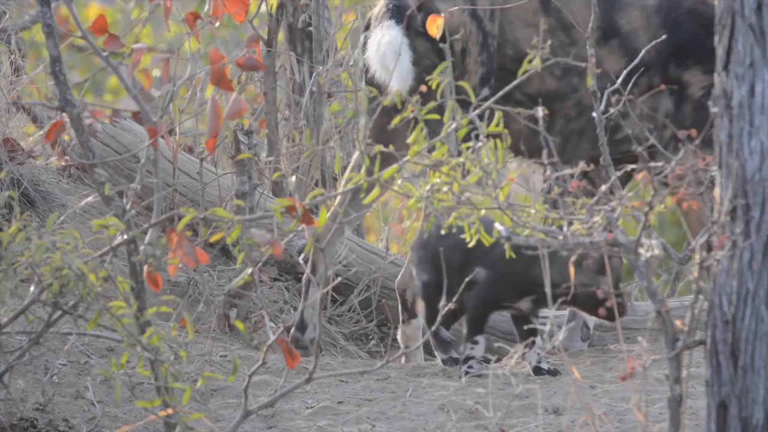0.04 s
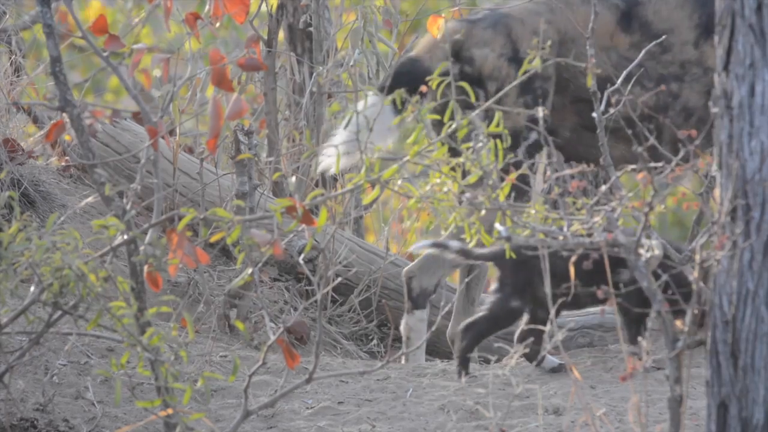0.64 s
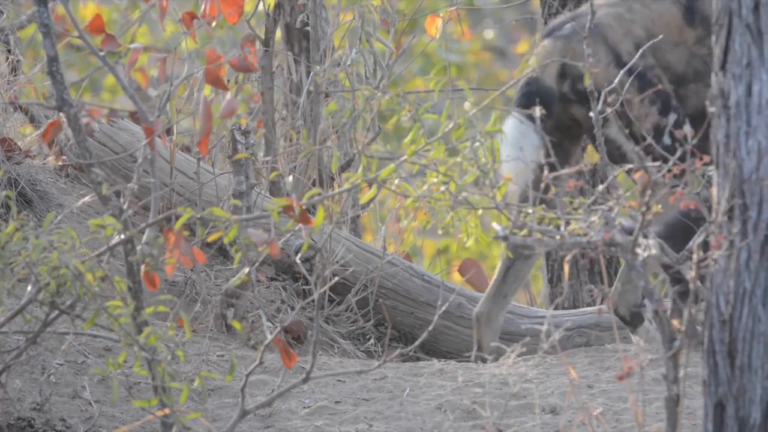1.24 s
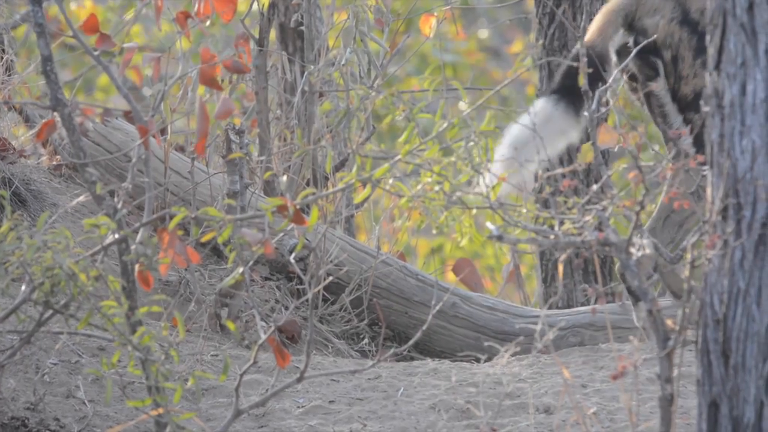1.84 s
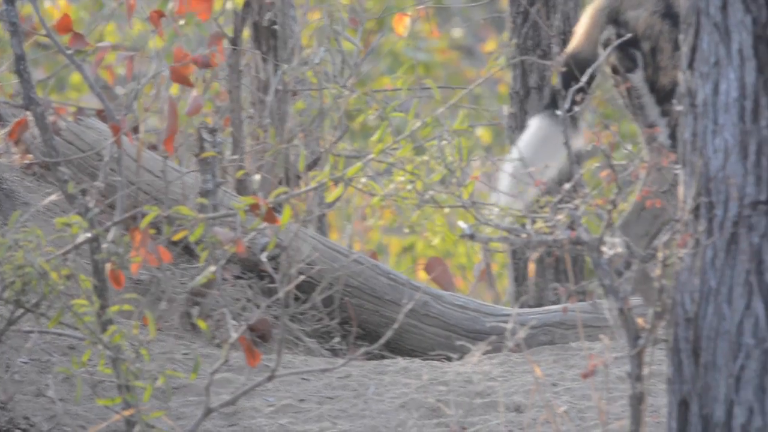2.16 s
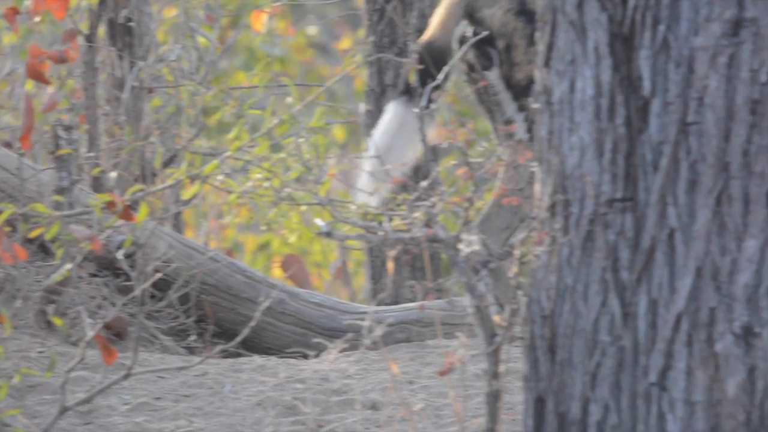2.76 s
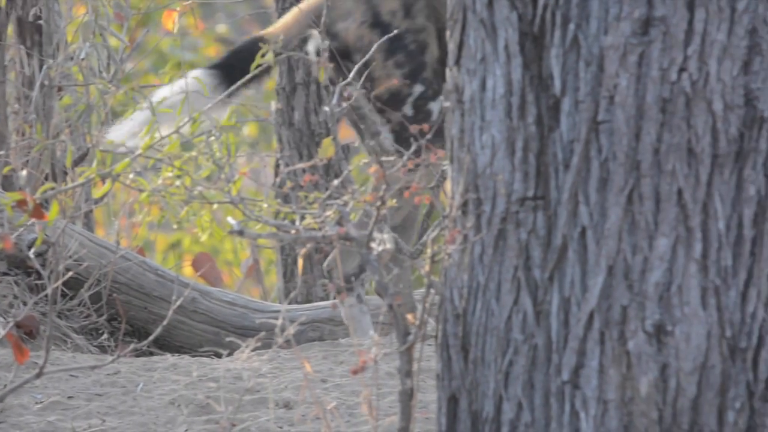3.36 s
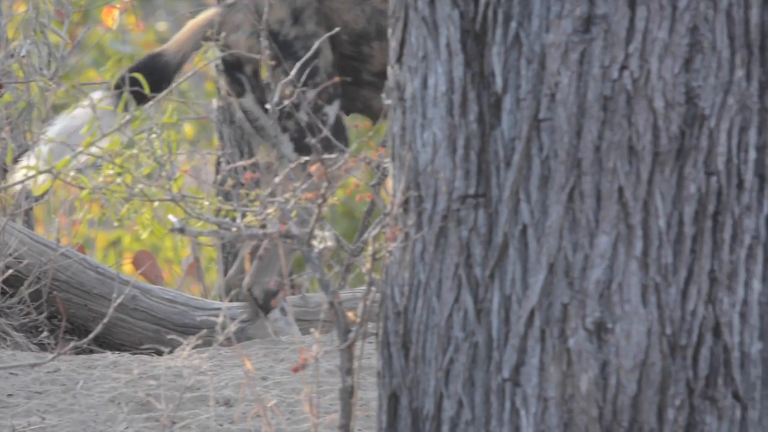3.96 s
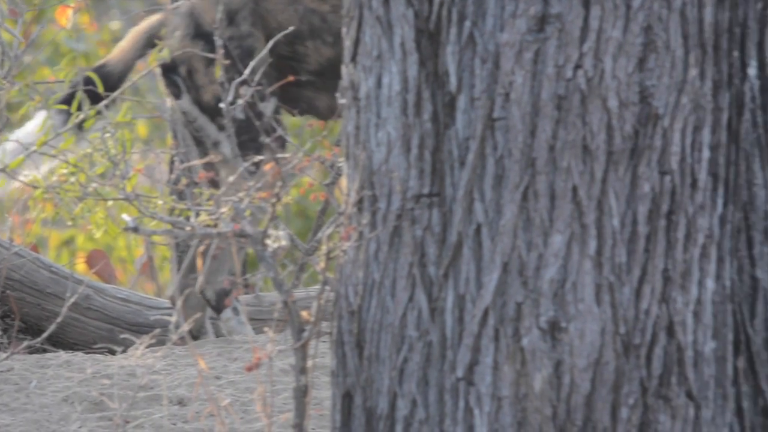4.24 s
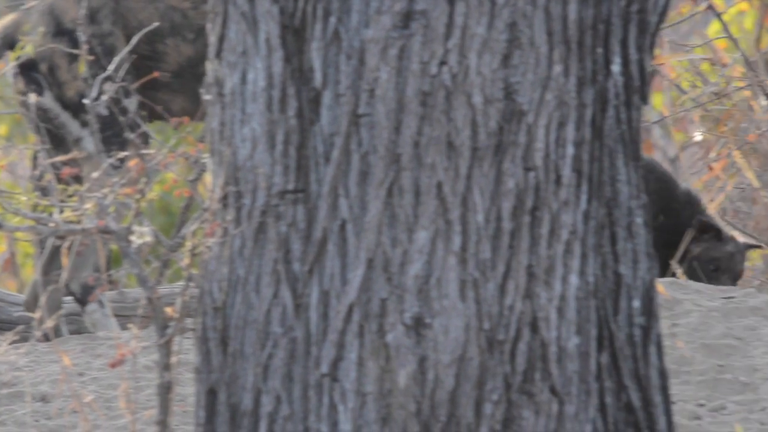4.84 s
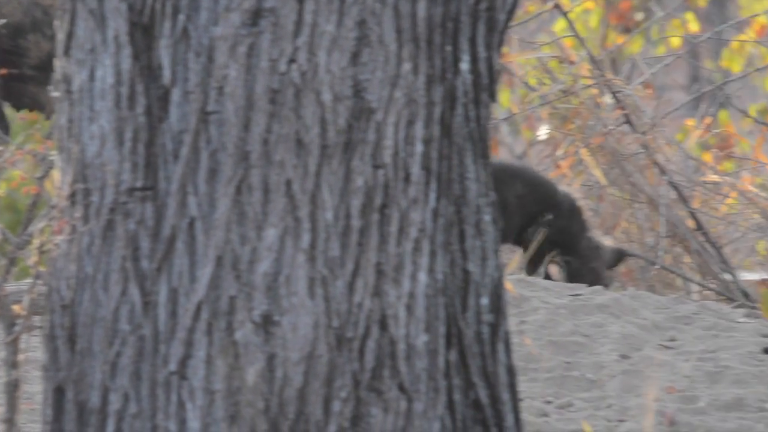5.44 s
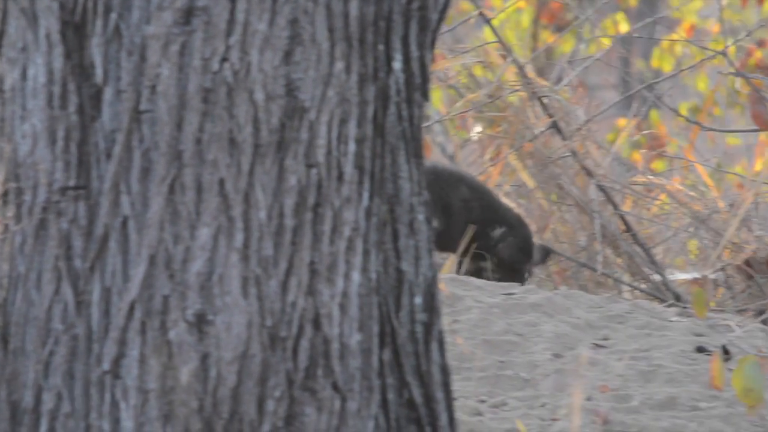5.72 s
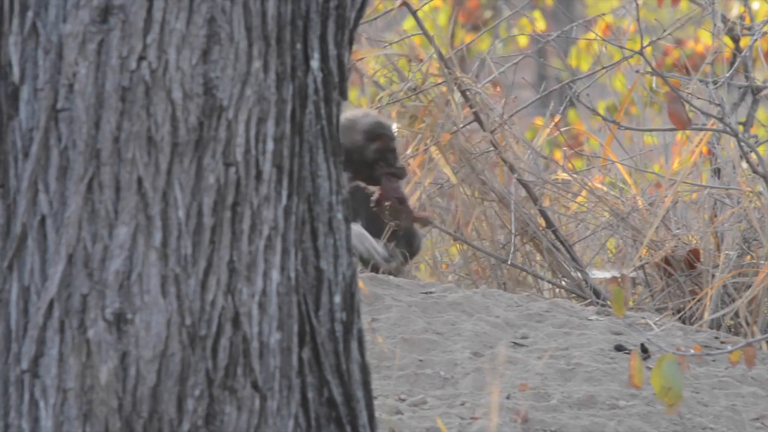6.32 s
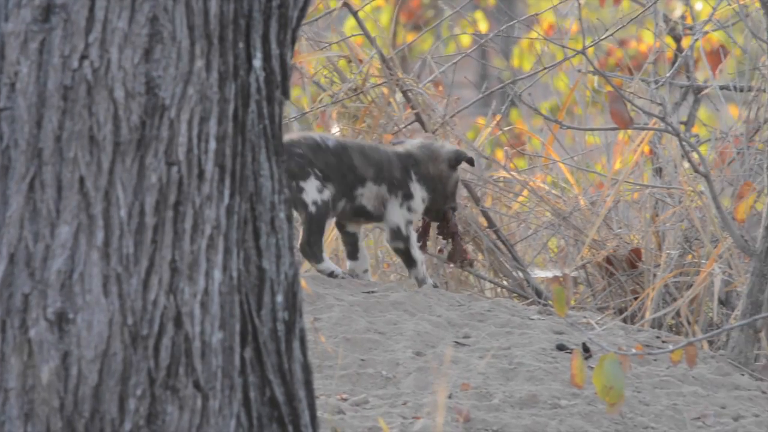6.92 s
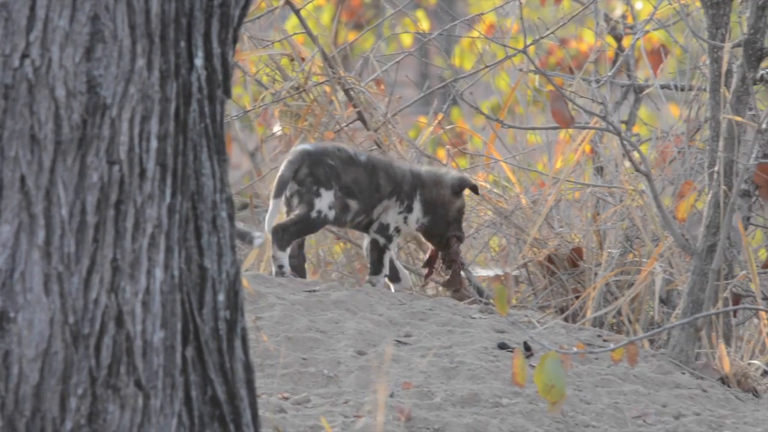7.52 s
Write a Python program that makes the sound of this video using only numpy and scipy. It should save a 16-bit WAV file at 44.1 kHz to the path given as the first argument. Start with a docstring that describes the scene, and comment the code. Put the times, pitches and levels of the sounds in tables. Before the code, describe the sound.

Wild dogs give short, high twittering chirps and whimpers in the bush, over a low gusting wind rumble.

```python
"""Wild dogs at a woodland den

Dogs twitter in short pitch arches, two of them louder, that ring among the trunks; whimpers glide
through a mouth resonance. Thin whistles, from pups or small birds, come from ahead and the right.
Paws crackle in dry leaves. Wind buffets the right microphone with a low rumble, over a faint hiss."""
import sys
import numpy as np
from scipy import signal
from scipy.fft import rfft, irfft
from scipy.io import wavfile
from scipy.ndimage import uniform_filter1d, map_coordinates

SR = 44100
rng = np.random.default_rng(int(sys.argv[2]) if len(sys.argv) > 2 else 0)


def materialize(psi):
    """Save the field psi as 16-bit PCM at rate SR to the path in sys.argv[1].

    A 1-D psi becomes a single channel; in a 2-D psi each row is a channel.
    """
    bounded = np.clip(np.atleast_2d(psi).T, -1, 1)
    quanta = np.round(bounded * 32767).astype(np.int16)
    wavfile.write(sys.argv[1], SR, quanta)


N = 338672
TIME = np.arange(N) / SR

# Table levels precede the mix gains. Pan is left minus right; crest is the top's place in the call.
# dog chirps: (time [s], length [s], top [Hz], rise [semitones], fall [semitones], crest [0-1],
#   level [dB], 2nd harmonic [dB], 3rd harmonic [dB], pan [dB], echo send [dB], rasp [0-1])
TWITTERS = [ (2.913, 0.06, 3340, 2.4, 1.5, 0.49, -73.5, 12.5, 7, 0, 0, 0.37),
            (3.018, .068, 3280, 1.2, 1, 0.38, -64.5, 3.5, -5, 0, -3, 0.12),
            (3.095, .04, 1560, 7, 0, .98, -62, -12, -12, -11, -7, .3),
            (3.588, .046, 3280, 2.5, 1, 0.32, -51, -9, -17, 0, -3.5, 0.27),
            (3.622, .025, 2000, -1, 5, 0, -54.5, -20, -24, 0, -8, .8),
            (3.647, 0.013, 1765, 1.5, 0, .8, -53.5, -20, -24, 0, -3.5, .7),
            (3.772, .06, 3140, 5, 0.8, .55, -46.5, -9.5, -20, 0.5, -6, 0.3),
            (4.124, 0.016, 1420, 1, 9, 0, -57, -9, -11.5, -24, -12, .67),
            (4.27, 0.012, 2100, 3.5, 1, 0.9, -59, -16, -12, -15, -14, 0.5),
            (4.301, 0.015, 2110, 1, 3, 0, -56, -21, -22, -22, -14, .6),
            (4.932, 0.017, 967, 0.5, 2, .3, -64.5, -0.5, -8, -18, -22, .3),
            (5.575, 0.064, 2990, 3.3, 6, .45, -70, -10, -16, -21, -7, 0.5),
            (5.673, .062, 3150, 6, 1.5, .55, -69, -1, -12, -18, -4, .5),
            (6.068, 0.051, 3060, 2.3, 2.8, 0.64, -55, -3, -18, -24, -10, .54),
            (6.172, 0.077, 2770, 1, 3.5, 0.55, -77, 8, -6, -17, -13, .5),
            (6.243, 0.028, 2180, -0.5, 7, 0, -67.5, -12, -20, -18, -12, 0.7),
            (6.445, 0.064, 3110, 5.5, 2, 0.88, -58.5, 5, -14, -28, -7.5, 0.62),
            (6.512, 0.02, 2320, -2, 10, .02, -63, -12, -18, -19, -8, 0.9),
            (7.124, 0.023, 1743, 4, 4, 1, -56.5, -19, -18, -22, -13, 0.6),
            (7.147, .062, 2910, 5, 8.5, 0.43, -65.5, -3, -16, -22, -8, 0.4)]
# dog whimpers: (time [s], length [s], top [Hz], rise [semitones], fall [semitones], crest [0-1],
#   level [dB], pan [dB])
WHIMPERS = [ (1.551, .13, 1641, 7.5, 1, .85, -56.5, 0), (1.887, .154, 1844, 7, 3, 0.32, -53, 0),
            (2.164, 0.11, 2095, -1.5, 0, .5, -53, -17), (2.229, 0.035, 1180, 2.5, 1, 0.48, -48, 0),
            (2.478, .036, 1223, 1.6, .5, .5, -52.5, 0), (2.57, 0.088, 1545, 6.5, 5.5, 0.4, -52, 0),
            (7.54, 0.073, 2180, -1.4, 0, 0.4, -56, -4)]
# thin whistles: (time [s], length [s], pitch [Hz], scoop [semitones], slide [semitones],
#   level [dB], swell [dB], pan [dB], rasp [0-1])
WHISTLES = [ (.005, 0.029, 8020, .2, 0, -65.5, -7, -21, .3), (0.217, 0.05, 3850, 0, 1.2, -71, 5, -18, .1),
            (.747, .055, 10900, 0, .5, -73, 0, -14, .1), (0.756, 0.12, 7620, 1.5, -.6, -71, 6, -19, .1),
            (0.89, 0.045, 6430, 2, 0.5, -67, -2, -19, .1),
            (0.936, 0.137, 5880, 0.5, 0.5, -63.5, -0.5, -23, 0.7),
            (0.978, 0.11, 7710, 1, 0, -72, -4, 0, .1), (1.203, .036, 9450, 2.4, -0.7, -61, 3, -23, .78),
            (1.437, 0.034, 7870, 1.5, 0.5, -68, -7, 2, 0), (1.523, .026, 6180, 0, 1.1, -67, -8, -17, .4),
            (1.598, 0.059, 10900, 1, -.5, -69, 0, 2, 0), (1.69, 0.046, 5000, 7, -0.5, -63, 16, -22, 0.15),
            (1.83, .045, 14420, 2.5, 0, -64, 0, -4, .55),
            (1.876, .105, 12580, 0.5, -0.5, -64.5, -5, 0, 0.3),
            (2.059, 0.081, 7640, 2, 0.2, -72, -8, 0, 0.35),
            (2.148, .035, 4620, 3.8, -.4, -65.5, 2, -24, .1), (2.162, 0.037, 6930, 1, 0.5, -70, 0, -6, .6),
            (2.222, 0.04, 4140, 0, 0.8, -64, -3, -17, .1), (2.41, 0.14, 8500, -1, -.4, -67.5, 11, -21, 0),
            (2.452, .055, 15750, .9, -.6, -62, -6, -5, .6), (2.854, 0.13, 8060, 0.5, 0, -69.5, -8, 0, 0.35),
            (3.403, .06, 4950, -0.5, -2.7, -72, 2, -17, .1), (3.428, 0.052, 9380, 3, 0, -70, 12, -2, 0.4),
            (3.537, .037, 9640, 3.2, 0.5, -66.5, -5, 0, .55),
            (4.15, 0.16, 5320, -1, -0.5, -73, 3, -19, 0.4), (4.52, .115, 5480, .1, -.3, -75, 0, -11, .15),
            (4.85, .15, 5380, .1, 0, -66.5, 3, -21, .12), (4.99, .043, 4910, -1, -0.5, -71, -6, -14, 0),
            (5.085, .071, 7915, 0, 0, -63, -6, 1, .22),
            (5.244, 0.099, 5240, -1.5, -.9, -66.5, 13, -21, 0.22),
            (5.403, .14, 7880, .35, -.15, -64.5, -1, 0, .4), (5.513, .1, 5280, 0, -.8, -62, 3, -28, .25),
            (5.612, 0.044, 4970, -0.5, 1, -54, 0, -31, .45), (5.788, 0.022, 7800, 1.3, 0, -58.5, 4, 0, 0.9),
            (5.803, 0.15, 5590, 4, -1.1, -65, 4, -20, 0.06),
            (5.96, 0.017, 4600, 0.5, 1.5, -47.5, -4, -34, 1), (6.115, 0.055, 7360, 0.9, 0, -61, 3, 0, 0.17),
            (7.442, .045, 11430, 0.5, 0, -69, 4, 0, .1), (7.482, .028, 12500, 0, 0.5, -63.5, -4, 0, 0.2)]
# steps in leaf litter: (time [s], length [s], level [dB], centre [Hz])
STEPS = [(0.264, 0.064, -68, 2430), (0.363, 0.21, -71, 3120), (.66, 0.35, -73.5, 3000),
         (0.922, 0.32, -74, 4000), (2.47, 0.16, -68, 11500), (2.602, 0.13, -69.5, 12000),
         (3.42, .07, -71, 10500), (4.094, .05, -72, 9000), (5.77, 0.054, -70, 11000),
         (6.3, .05, -72, 12900), (6.9, .03, -70, 9500), (6.96, 0.041, -73, 8000), (7.035, .04, -70, 9500),
         (7.15, .06, -71, 10000), (7.245, .03, -69, 10000)]
# breeze on the microphone: (time [s], rumble [dB], eddy offset [dB])
BREEZE = [(0, -49, -17), (.12, -53, -26), (.4, -46, -16.5), (1.5, -47.5, -25.5), (1.85, -49, -15),
          (2.1, -41.5, -15), (2.42, -42.5, -16.5), (2.9, -42, -17), (3.42, -44.5, -16), (3.8, -39.5, -16.5),
          (4.8, -38.5, -14.5), (5.2, -34, -12), (5.8, -32.5, -14), (6.3, -35, -16), (6.72, -37.5, -16),
          (7.1, -41, -12.5), (7.5, -40, -23), (7.68, -48, -11)]
# gusts: (time [s], length [s], rumble [dB], eddy offset [dB])
GUSTS = [(0.232, 0.053, -36.5, -36), (0.296, .11, -37.5, -25), (0.659, 0.053, -35.5, -16.5),
         (0.74, 0.11, -38, -27.5), (0.871, 0.049, -35.5, -20), (0.965, 0.091, -39.5, -27),
         (1.188, 0.057, -43.5, -12), (1.32, 0.2, -42, -30), (2.127, .12, -37.5, -18),
         (2.508, 0.14, -36.5, -11), (2.595, 0.22, -30.5, -19.5), (3.095, 0.12, -38.5, -17),
         (3.557, 0.028, -34.5, -30), (3.622, 0.085, -35, -13.5), (4.011, 0.052, -35.5, -21),
         (4.145, 0.21, -38.5, -8.5), (4.34, 0.024, -32.5, -15), (4.596, 0.093, -29, -23),
         (4.868, 0.064, -31, -13), (4.994, 0.11, -36, -9.5), (5.344, 0.2, -26.5, -10.5),
         (5.502, .1, -27.5, -10), (5.662, 0.063, -28, -23), (6.334, 0.12, -35.5, -19),
         (6.606, 0.039, -41, -6), (6.742, 0.048, -33, -9.5), (6.81, 0.043, -34, -17),
         (7.24, 0.13, -37, -12)]
# sharp air pulses: (time [s], level [dB], pitch [Hz])
BUFFETS = [(0.671, -38, 177), (0.909, -41, 138), (1.832, -37.5, 172), (2.617, -32, 290),
           (2.621, -19.5, 104), (2.77, -42.5, 230), (3.645, -38, 166), (4.168, -48, 188),
           (4.691, -33.5, 186), (4.744, -33, 163), (5.072, -44, 160), (5.339, -32, 207),
           (5.553, -22.5, 102), (5.618, -37.5, 366), (5.781, -40, 159), (6.427, -49, 170)]
# large eddies: (frequency [Hz], relative density [dB])
RUMBLE_SPECTRUM = [(5, -19), (16, -4), (42, -1.5), (65, -2.5), (92, -7), (130, -12.5), (190, -33),
                   (300, -37.5), (600, -83.5)]
# small eddies: (frequency [Hz], relative density [dB])
EDDY_SPECTRUM = [(50, -10), (110, -5.5), (160, 4), (220, -7.5), (310, -20), (450, -28.5), (800, -43),
                 (2000, -75)]
# background hiss: (frequency [Hz], relative density [dB])
HISS_SPECTRUM = [(20, 2), (100, -2), (300, 0.5), (700, 0.5), (1600, -1), (3000, -3), (5200, -4),
                 (8000, -6.5), (15500, -8)]

ATTACK_S, RELEASE_S = .009, .0056  # all calls
SLOPE_DB_PER_SEMITONE, SLOPE_RANGE_DB = 2.55, 10
MOUTH_HZ, MOUTH_WIDTH_HZ = 1580, 225
WOOD_T60_S, SCATTER_S = .94, .033
GUST_ATTACK_S, GUST_RELEASE_S, GUST_SAG_DB_PER_S = .026, .082, 29.5
HISS_DB, CUTOFF_HZ = -62.5, 15750


def twitters():
    """Arched chirps and quick slurs: loud and clear at the top, weak and hoarse on the slopes."""
    direct, send = np.zeros((2, 2, N))
    for (start_s, length_s, top_hz, rise, fall, crest,
         db, second_db, third_db, pan_db, echo_db, rasp) in TWITTERS:
        t, progress, below_top = arch(length_s, rise, fall, crest)
        slack = np.tanh(SLOPE_DB_PER_SEMITONE * np.maximum(below_top, 0) / SLOPE_RANGE_DB)
        hz = top_hz * semitones(-below_top)
        overtones_db = (second_db, third_db, third_db - 8)
        tone = voice(progress, hz, overtones_db, rasp + .6 * slack, flutter_db=2.6)
        call = pan(pan_db) * tone * undb(db - SLOPE_RANGE_DB * slack) * envelope(t, length_s)
        add(direct, start_s + t[0], call)
        add(send, start_s + t[0], call * undb(echo_db))
    return undb(-2.7) * direct + woodland(send, scatter_db=-2, tail_db=-6)


def whimpers():
    """Lower, nearly pure arches that ring out where their pitch crosses a mouth resonance."""
    direct = np.zeros((2, N))
    for start_s, length_s, top_hz, rise, fall, crest, db, pan_db in WHIMPERS:
        t, progress, below_top = arch(length_s, rise, fall, crest)
        hz = top_hz * semitones(-below_top)
        tone = voice(progress, hz, overtones_db=(-32, -24), rasp=.19)
        mouth = 1 / np.hypot(1, 2 * (hz - MOUTH_HZ) / MOUTH_WIDTH_HZ)
        add(direct, start_s + t[0], pan(pan_db) * undb(db) * tone * mouth * envelope(t, length_s))
    return undb(-3) * direct + woodland(direct, scatter_db=-15.5, tail_db=-19.5)


def whistles(scoop_s=.011):
    """Almost pure high notes that scoop to pitch, then slide; some end roughly."""
    direct, send = np.zeros((2, 2, N))
    for start_s, length_s, pitch_hz, scoop, slide, db, swell_db, pan_db, rasp in WHISTLES:
        t, progress = call_time(length_s)
        hz = pitch_hz * semitones(slide * progress - scoop * np.exp(-progress * length_s / scoop_s))
        tone = voice(progress, hz, (), rasp, jitter=.017, hoarse=.6)
        call = pan(pan_db) * tone * undb(db + swell_db * (progress - .5)) * envelope(t, length_s)
        echo_db = -1 - .26 * abs(pan_db)  # far ahead, drier on the right
        add(direct, start_s + t[0], call)
        add(send, start_s + t[0], call * undb(echo_db))
    return undb(-3) * direct + woodland(send, scatter_db=.5, tail_db=-15)


def voice(progress, hz, overtones_db, rasp, jitter=.042, hoarse=.8, flutter_db=2.2):
    """Gliding harmonic tone; rasp shakes pitch and strength, most at the end."""
    size = len(progress)
    strain = rasp * (.5 + progress ** 2)
    shake = .6 * walk(220, size) + walk(800, size)  # warble plus cycle-scale jitter
    phase = 2 * np.pi * np.cumsum(hz * (1 + jitter * strain * shake)) / SR
    tone = np.sin(phase) + sum(undb(db) * np.sin(k * phase) for k, db in enumerate(overtones_db, 2))
    tone *= (1 + hoarse * strain * walk(695.5, size)) / np.hypot(1, hoarse * strain)
    return np.sqrt(2) * tone * undb(flutter_db * walk(150, size))


def arch(length_s, rise, fall, crest):
    """Time [s], progress [0-1], depth below the top [semitones]; a negative rise starts above it."""
    t, progress = call_time(length_s)
    crest = np.clip(crest, .02, .98)
    rising = rise * (1 - progress / crest) ** 2
    falling = fall * ((progress - crest) / (1 - crest)) ** 2
    return t, progress, np.where(progress < crest, rising, falling)


def woodland(x, scatter_db, tail_db):
    """Near trunks scatter sound for tens of ms; the far wood returns a long tail."""
    t = np.arange(3 * SR // 2) / SR
    onset = 1 - np.exp(-(t / .0062) ** 2)
    scatter = undb(scatter_db) * unit(onset * np.exp(-t / SCATTER_S))
    tail = undb(tail_db) * unit(onset * undb(-60 * t / WOOD_T60_S))
    decay = np.hypot(scatter, tail) / np.sqrt(len(t))
    spread = np.clip(.48 + t / .6, 0, 1)  # late echoes come from all round
    shared = np.sqrt(1 - spread ** 2) * rng.standard_normal(len(t))
    diffuse = spread * rng.standard_normal((2, len(t)))
    return signal.fftconvolve(x, decay * (shared + diffuse), axes=1)[:, :N]


def paws():
    """Each step presses dry leaves: a short swell of tiny uneven cracks."""
    out = np.zeros((2, N))
    for start_s, length_s, db, hz in STEPS:
        size = int(length_s * SR)
        cracks = rng.standard_normal(size) * (rng.random(size) < .1)
        cracks *= undb(2 * rng.exponential(size=size))
        leaf_band = signal.butter(1, [hz / 1.5, min(hz * 1.5, .45 * SR)], "band", fs=SR, output="sos")
        swell = np.sin(np.pi * np.sqrt(np.arange(size) / size))
        add(out, start_s, pan(-3) * undb(db) * swell * unit(signal.sosfilt(leaf_band, cracks)))
    return out


def wind():
    """Large eddies rumble and small ones flutter on the right microphone; gusts jump, then sag."""
    times_s, *columns = np.transpose(BREEZE)
    rumble_db, eddy_db = (np.interp(TIME, times_s, column) for column in columns)
    rumble, eddies = undb(rumble_db), undb(rumble_db + eddy_db)
    for start_s, length_s, db, offset_db in GUSTS:
        t = TIME - start_s
        gust = undb(db - GUST_SAG_DB_PER_S * np.abs(t))
        gust *= envelope(t - GUST_ATTACK_S / 2, length_s, GUST_ATTACK_S, GUST_RELEASE_S)
        rumble = np.hypot(rumble, gust)
        eddies = np.hypot(eddies, gust * undb(offset_db))
    air = undb(6) * rumble * steady(noise(RUMBLE_SPECTRUM), window_s=.088)
    air += undb(5) * eddies * steady(noise(EDDY_SPECTRUM), window_s=.07)
    air *= undb(1.1 * walk(14, N))
    for start_s, db, hz in BUFFETS:
        t = np.arange(-1 / hz, 1 / hz, 1 / SR)
        phase = 2 * np.pi * hz * t
        push_pull = -phase * np.exp((1 - phase ** 2) / 2)
        add(air, start_s + t[0], undb(db) * push_pull)
    return air * undb([[-49.5], [0]])  # left microphone sheltered


def hiss():
    """Faint hiss of bush and microphones, partly shared between the sides."""
    shared = undb(-7) * noise(HISS_SPECTRUM)
    sides = [unit(shared + noise(HISS_SPECTRUM)) * undb(db) for db in (-.9, .9)]
    return np.array(sides) * undb(HISS_DB + .91 * walk(3.01, N))


def call_time(length_s):
    """Time [s], including both ramps, and progress [0-1]."""
    t = np.arange(-ATTACK_S / 2, length_s + RELEASE_S / 2, 1 / SR)
    return t, np.clip(t / length_s, 0, 1)


def envelope(t, length_s, attack_s=ATTACK_S, release_s=RELEASE_S):
    """Attack, hold, release; ramps centred on start and end."""
    ramp = np.minimum(t / attack_s, (length_s - t) / release_s) + .5
    return np.sin(np.pi / 2 * np.clip(ramp, 0, 1))


def noise(spectrum):
    """Noise of rms 1, coloured by (frequency [Hz], level [dB]) points."""
    hz, db = np.transpose(spectrum)
    bins_hz = np.maximum(np.fft.rfftfreq(N, 1 / SR), 1)
    gain = undb(np.interp(np.log(bins_hz), np.log(hz), db))
    return unit(irfft(rfft(rng.standard_normal(N)) * gain, N))


def steady(x, window_s):
    """Level out slow swells."""
    return x / np.sqrt(uniform_filter1d(x ** 2, int(window_s * SR)) + 1e-6)


def walk(rate_hz, size):
    """Smooth random curve, spread near 1."""
    steps = np.arange(size) * rate_hz / SR
    return map_coordinates(rng.standard_normal(4096), [steps], order=3, mode="wrap")


def add(track, start_s, sound):
    """Mix a sound into a track."""
    i = max(int(start_s * SR), 0)
    track[..., i:i + sound.shape[-1]] += sound[..., :N - i]


def pan(pan_db):
    """Constant-power left and right gains."""
    return unit(undb([[pan_db / 2], [-pan_db / 2]]))


def semitones(steps):
    """Semitones to frequency ratio."""
    return 2 ** (steps / 12)


def undb(db):
    """Decibels to gain."""
    return 10 ** (np.asarray(db) / 20)


def unit(x):
    """Scale to rms 1."""
    return x / np.sqrt(np.mean(x ** 2))


def scene():
    """Calls, steps, wind and hiss."""
    return twitters() + whimpers() + whistles() + paws() + wind() + hiss()


def record(dry):
    """Steep recorder low-pass."""
    return signal.sosfilt(signal.ellip(16, .1, 80, CUTOFF_HZ, fs=SR, output="sos"), dry)


dry = scene()
out = record(dry)
materialize(out)
```